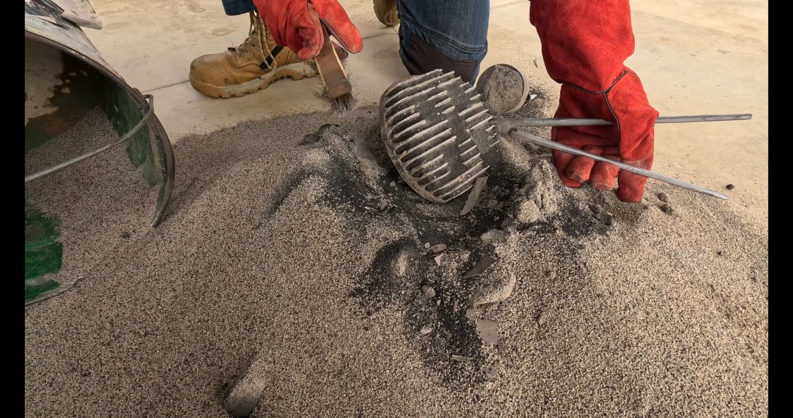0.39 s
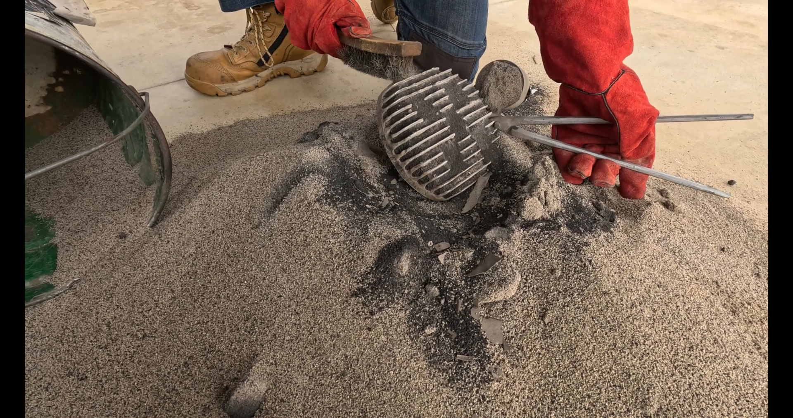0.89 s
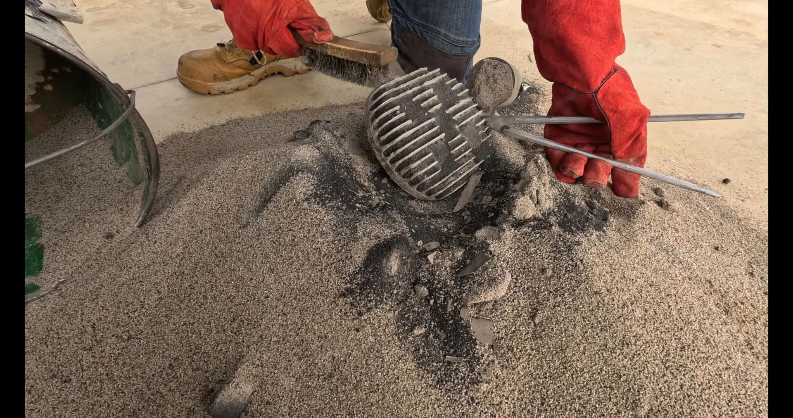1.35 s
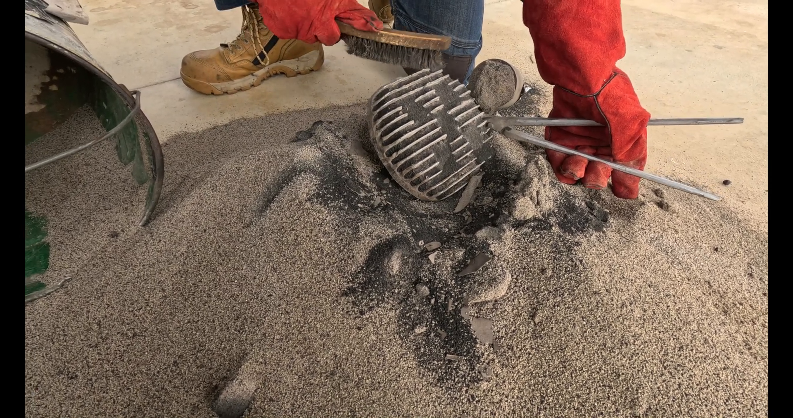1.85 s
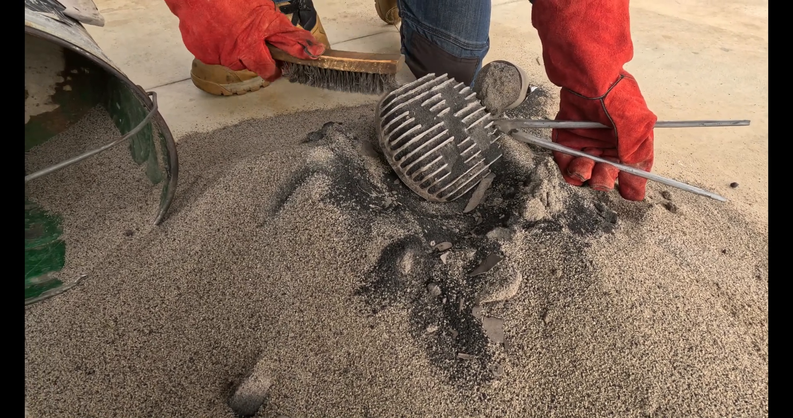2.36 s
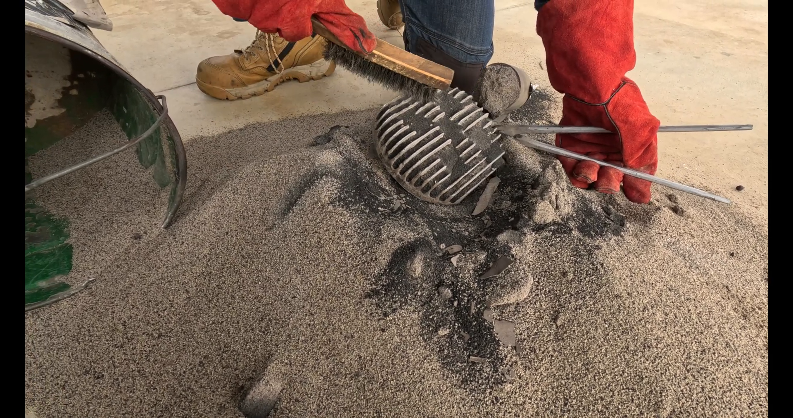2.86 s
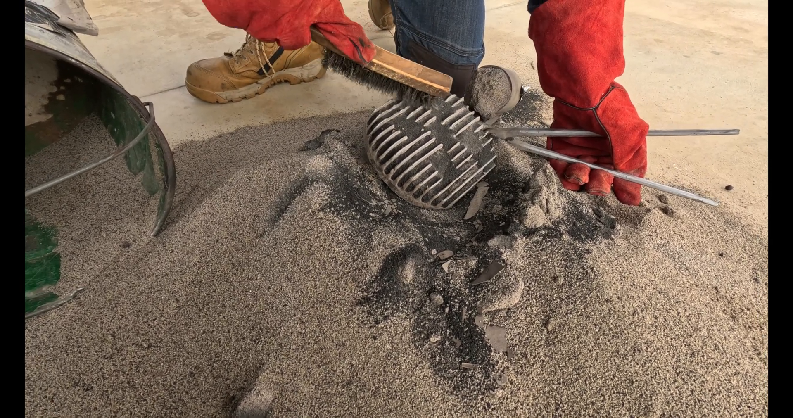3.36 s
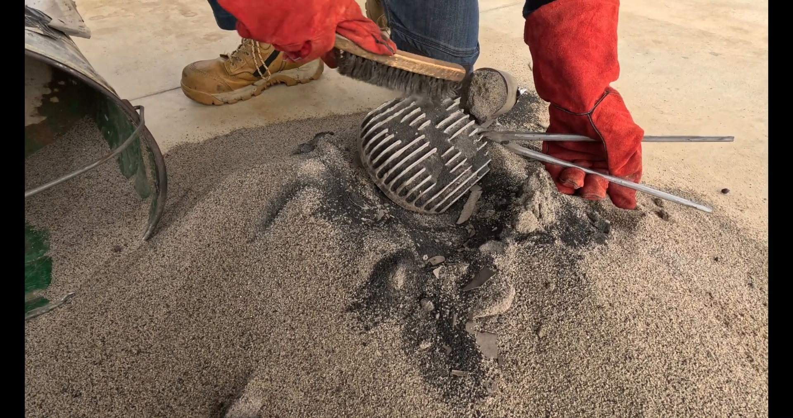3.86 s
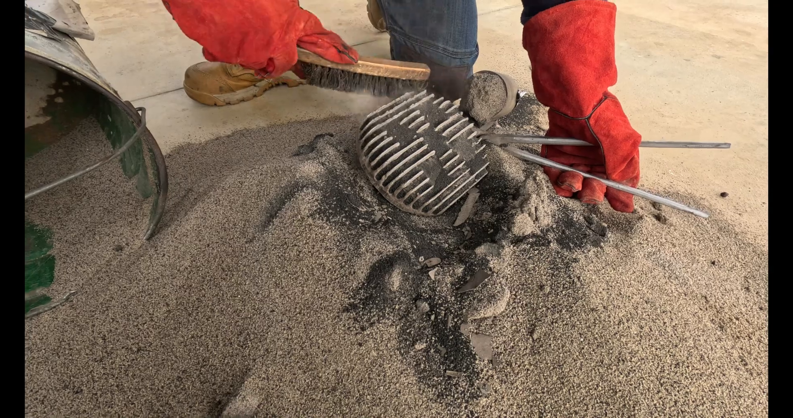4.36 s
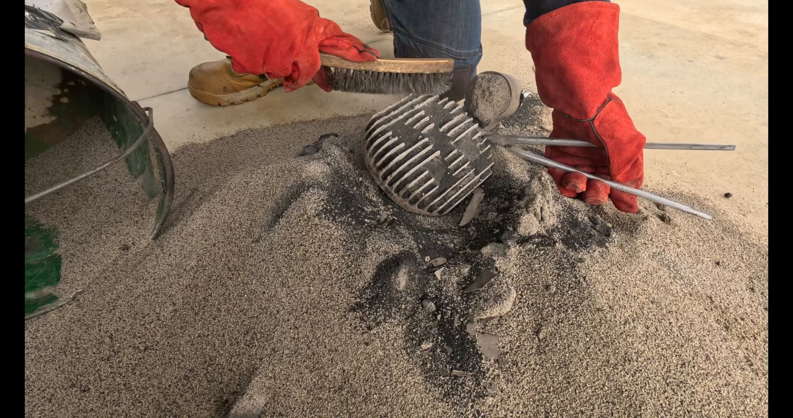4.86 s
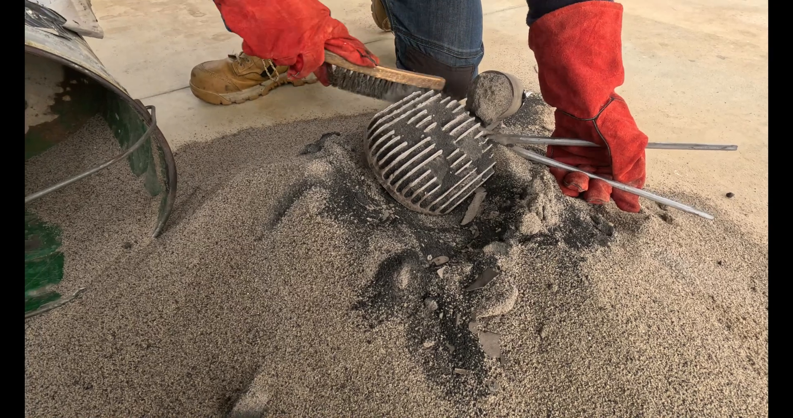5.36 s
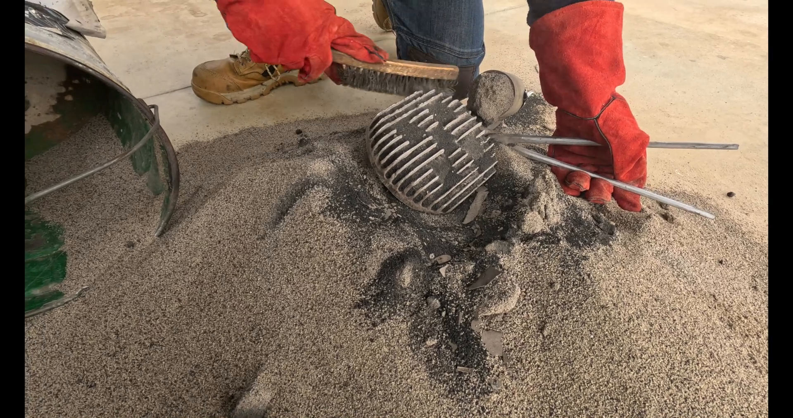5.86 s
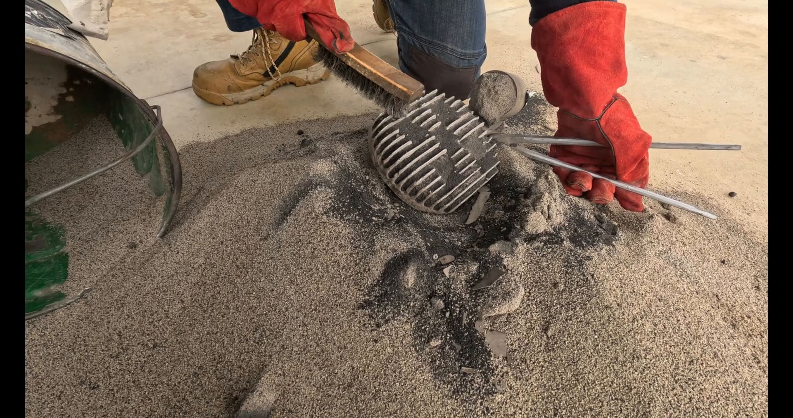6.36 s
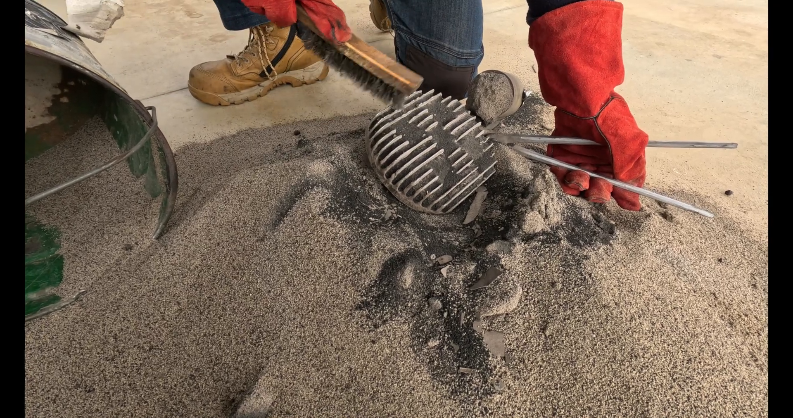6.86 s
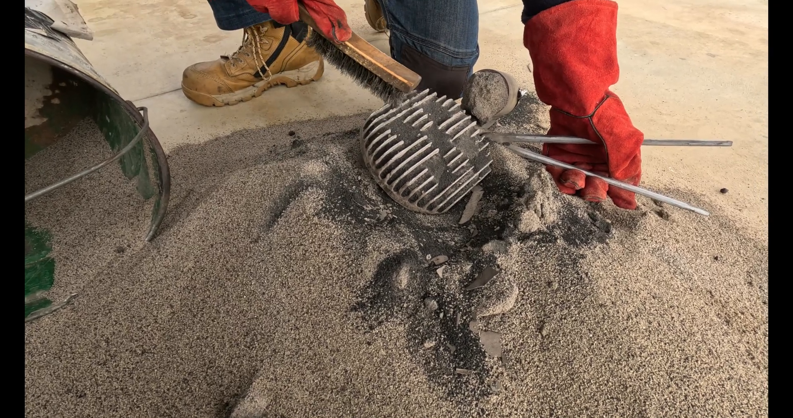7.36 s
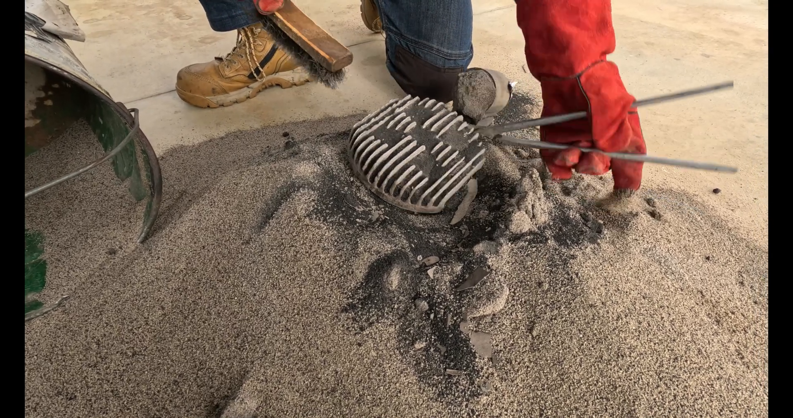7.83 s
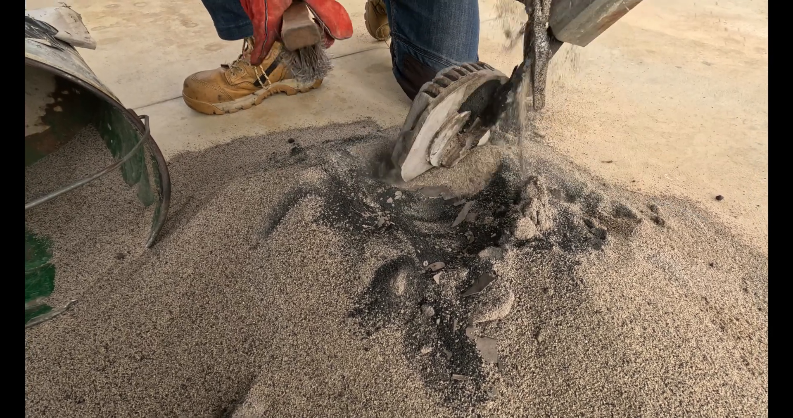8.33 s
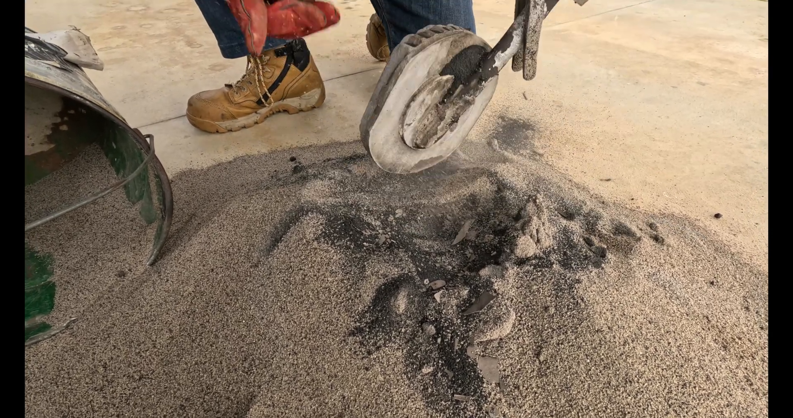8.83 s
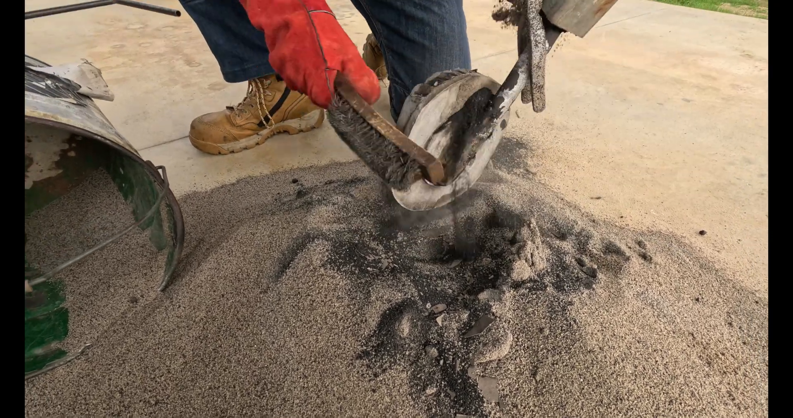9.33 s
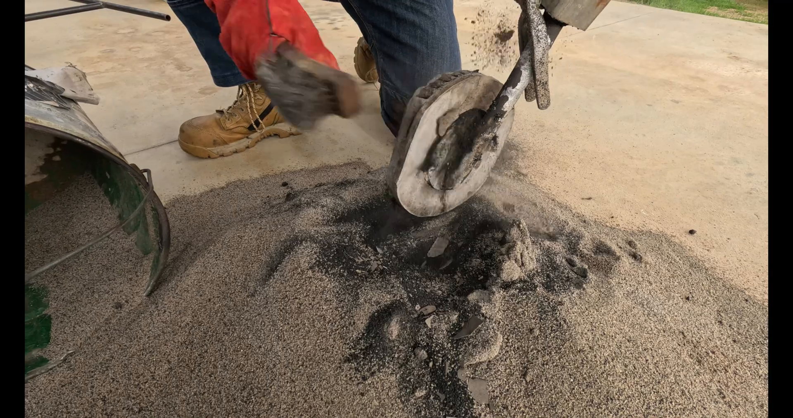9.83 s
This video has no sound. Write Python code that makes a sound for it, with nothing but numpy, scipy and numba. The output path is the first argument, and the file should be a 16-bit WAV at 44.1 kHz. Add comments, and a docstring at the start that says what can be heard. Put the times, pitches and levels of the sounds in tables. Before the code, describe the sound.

Close stereo view of a stiff brush scrubbing a sandy finned metal casting. Uneven short strokes and longer sweeps rasp brightly, with small ticks and dropping grit. Strokes quicken and strengthen, then a rattling scuff as the piece is lifted, and four loud wooden-backed knocks ring out with short echoes off a large shed nearby. A bird peeps faintly; low air rumble and distant hiss lie beneath.

```python
"""Scrubbing sand off a finned casting

A stiff brush scrubs a metal casting beside a large shed; its wooden back knocks the casting four times near the end.
Random bristle flicks make the strokes, decaying sine modes the knocks, sines with overtones the bird's peeps.
Noise makes the sand ticks and scuffs, the air on the microphone ports and a far hiss; a limiter holds the knocks."""
import sys
import numpy as np
from scipy import signal
from scipy.fft import rfft, irfft, next_fast_len
from scipy.io import wavfile
from scipy.ndimage import uniform_filter1d, minimum_filter1d
from numba import njit

SR = 44100
rng = np.random.default_rng(int(sys.argv[2]) if len(sys.argv) > 2 else 0)


def waveform_to_disk(signal):
    """Save audio, clipped to [-1, 1], as 16-bit WAV at the path in sys.argv[1]."""
    frames = np.transpose(np.atleast_2d(signal))
    scaled = np.clip(frames, -1, 1) * 32767
    samples = np.round(scaled).astype(np.int16)
    wavfile.write(sys.argv[1], SR, samples)


def ratio_of_db(decibels):
    """Turn decibels (scalar or array-like) into linear amplitude factors; 0 dB maps to 1."""
    return 10 ** (np.asarray(decibels, float) / 20)


N = 439236
SIZE = next_fast_len(N + SR)
HZ = np.maximum(np.arange(SIZE // 2 + 1) * SR / SIZE, 1)


def rms_one(x):
    """Scales to rms 1."""
    return x / np.sqrt(np.mean(x ** 2) + 1e-20)


def at_hz(points):
    """Reads a table at every spectral line, along log frequency."""
    hz, value = np.transpose(points)
    return np.interp(np.log(HZ), np.log(hz), value)


def shaped(x, response):
    """Filters by a frequency response."""
    return irfft(rfft(x, SIZE) * response, SIZE)[..., :N]


def band_pass(x, low_hz, high_hz, order):
    """Butterworth band."""
    return signal.sosfilt(signal.butter(order, [low_hz, high_hz], "band", fs=SR, output="sos"), x)


def drift(rate_hz):
    """Random wander of spread 1: noise through two equal one-pole low-passes."""
    r = np.exp(-2 * np.pi * rate_hz / SR)
    wander = signal.lfilter([1], [1, -2 * r, r * r], rng.standard_normal(N + SR))
    return rms_one(wander[SR:])


def ring(clicks, hz, t60_s):
    """Damped mode: a unit click starts a sine of height 1."""
    r, w = ratio_of_db(-60 / (t60_s * SR)), 2 * np.pi * hz / SR
    return signal.lfilter([0, np.sin(w)], [1, -2 * r * np.cos(w), r * r], clicks + 1e-18)


@njit
def moving_peak(x, centre_hz, r, sr):
    """Two-pole resonance whose centre moves."""
    y = np.zeros(len(x))
    for i in range(2, len(x)):
        drive = (1 - r * r) / 2 * (x[i] - x[i - 2])
        y[i] = drive + 2 * r * np.cos(2 * np.pi * centre_hz[i] / sr) * y[i - 1] - r * r * y[i - 2]
    return y


# Far sounds at the two ports. Each row: frequency in Hz, left-right likeness from 0 to 1.
LIKENESS = [(60, 0.9), (150, 1), (380, 0.69), (950, 0.79), (2380, 0.44), (5980, 0.82), (15000, 0.86)]


def diffuse(spectrum):
    """Stereo noise from all round, partly alike in both channels; rms 1."""
    mid, side = rfft(rng.standard_normal((2, SIZE)))
    alike = np.clip(at_hz(LIKENESS), 0, 1)
    pair = np.sqrt(1 + alike) * mid + np.sqrt(1 - alike) * side * [[1], [-1]]
    return rms_one(irfft(pair * ratio_of_db(at_hz(spectrum)), SIZE)[:, :N])


# Colour of the far hiss. Each row: frequency in Hz, relative level per Hz in dB.
HISS_COLOUR = [(150, -6), (250, -2.5), (348, -11), (373, -21), (452, -9.5), (845, -12), (1140, -2.5),
               (1530, -7.5), (1670, -5), (3840, -9), (6250, -14), (7800, -15), (8260, -21.5),
               (13900, -33.5), (16000, -52)]
HISS_DB = -56


def hiss():
    """Far hiss: coloured diffuse noise, wavering slightly in level."""
    return ratio_of_db(HISS_DB + .5 * drift(12)) * diffuse(HISS_COLOUR)


# Colour of the air noise. Each row: frequency in Hz, relative level per Hz in dB.
AIR_COLOUR = [(12, -59), (20, 6), (76, -3.5), (149, -7), (179, -7), (211, -10), (304, -18.5), (400, -22.5),
              (520, -59), (880, -120)]
# Air strength over time. Each row: time in seconds, level in dB.
AIR_LEVEL = [(0.0, -54.5), (0.72, -58), (0.8, -52.5), (2.88, -54), (3.05, -55.5), (3.49, -55), (4.94, -54),
             (5.13, -55.5), (6.99, -55.5), (7.18, -55), (7.74, -59), (8.04, -55), (8.32, -50.5),
             (8.63, -57), (9.26, -54.5), (9.96, -51)]


def air():
    """Air stirring on the ports: low rumbling noise with a fluttering level."""
    s, db = np.transpose(AIR_LEVEL)
    level_db = np.interp(np.arange(N) / SR, s, db) + 4.43 * drift(19)
    return ratio_of_db(level_db) * diffuse(AIR_COLOUR)


# Puffs on the ports. Each row: time in seconds, level in dB, left over right in dB, rise in seconds, flutter in dB.
BUMPS = [(0.261, -30, -5, 0.014, -25), (.753, -25.5, 0, 0.005, -8), (2.5, -29, -6, 0.015, -30),
         (3.134, -11.5, -9.5, 0.0053, -2.5), (8.168, -25.5, -5, 0.0065, -34),
         (8.371, -23.5, -2, 0.011, -1.5)]


def bumps(hold_s=0.0031, release_s=0.0043):
    """A puff pulls the membrane in more and more, it flutters and lets go, and the port leak overshoots."""
    pull, kicks = np.zeros((2, N)), np.zeros((2, N))
    t = np.arange(-2000, 2000) / SR - hold_s
    for s, db, pan_db, rise_s, flutter_db in BUMPS:
        size, i = ratio_of_db(db + np.array([[pan_db / 2], [-pan_db / 2]])), round(s * SR)
        pull[:, i - 2000:i + 2000] -= size * np.exp(np.where(t < 0, t / rise_s, -t / release_s))
        kicks[:, i] = size[:, 0] * ratio_of_db(flutter_db)
    flutter = ring(kicks, 273, 0.0068)
    return signal.lfilter(*signal.butter(1, 18, "high", fs=SR), pull + flutter)


# Colour of the echoes. Each row: frequency in Hz, level per Hz in dB.
SHED_COLOUR = [(76, -40), (130, 2.5), (192, 7.5), (284, -12), (597, -3.5), (807, -15), (1070, 1.5),
               (1450, -8), (1960, -9), (2510, -12), (4430, -24.5), (5190, -30), (9000, -45), (11700, -64),
               (19800, -120)]
# Decay of the echoes. Each row: frequency in Hz, t60 in seconds.
SHED_T60 = [(150, 0.29), (600, 0.73), (1500, 0.57), (4000, 0.48), (9000, 0.65)]


def shed(x, gap_s=0.0029, build_s=0.011):
    """Echoes off walls: noise that builds after a gap and dies octave by octave."""
    t, noise, tail = np.arange(SR) / SR, diffuse([(20, 0), (20000, 0)])[:, :SR], 0
    hz, t60_s = np.transpose(SHED_T60)
    for low_hz in 60 * 2. ** np.arange(8):
        band_t60_s = np.interp(np.log(low_hz * np.sqrt(2)), np.log(hz), t60_s)
        tail = tail + band_pass(noise, low_hz, 2 * low_hz, 2) * ratio_of_db(-60 * t / band_t60_s)
    tail = tail * (1 - np.exp(-np.maximum(t - gap_s, 0) / build_s))
    return shaped(x, rfft(tail, SIZE) * ratio_of_db(at_hz(SHED_COLOUR)))


# Peeps. Each row: loudest moment in seconds, length after it in seconds, pitch in Hz,
# first partial in dB, second partial in dB.
PEEPS = [(3.757, 0.064, 2836, -55, -54), (3.952, 0.11, 2770, -50, -58), (4.676, .125, 2710, -50.5, -53.5),
         (4.92, .03, 2730, -55, -59), (5.655, .11, 2614, -49, -59), (9.459, 0.11, 2550, -53, -59.5),
         (9.651, 0.073, 2540, -48.5, -71)]
# Partials 2 to 4. Each entry: level against the second partial's setting in dB.
PEEP_OVERTONES_DB = [0.5, -15, -24]
SCOOP_S, SCOOP_SHARE, SCOOP_DB = 0.0195, .1, -1   # slide up into the pitch, fast at first
PEEP_CREEP_PER_S = 0.067   # share by which the pitch then creeps up
FIRST_DB_PER_S, SECOND_DB_PER_S, PEEP_OFF_DB_PER_S = -130, -110, -1600


def bird():
    """Husky peeps: a wavering, rattling tone with overtones."""
    t, out = np.arange(N) / SR, np.zeros(N)
    waver, rattle = 1 + 0.0163 * drift(433), ratio_of_db(4.6 * drift(200))
    for s, length_s, hz, first_db, second_db in PEEPS:
        span = slice(round((s - .1) * SR), round((s + .25) * SR))
        before, after = np.maximum(s - t[span], 0), np.maximum(t[span] - s, 0)
        early = np.minimum(before / SCOOP_S, 1)
        outside_s = np.maximum(before - SCOOP_S, 0) + np.maximum(after - length_s, 0)
        gate_db = SCOOP_DB * early + PEEP_OFF_DB_PER_S * outside_s
        pitch_hz = hz * (1 - SCOOP_SHARE * early ** 2 + PEEP_CREEP_PER_S * after) * waver[span]
        phase = 2 * np.pi * np.cumsum(pitch_hz) / SR
        first = ratio_of_db(first_db + FIRST_DB_PER_S * after) * np.sin(phase)
        upper = sum(ratio_of_db(db) * np.sin((k + 2) * phase) for k, db in enumerate(PEEP_OVERTONES_DB))
        out[span] += ratio_of_db(gate_db) * (first + ratio_of_db(second_db + SECOND_DB_PER_S * after) * upper)
    return np.sqrt(2) * rattle * out


def rattles(table, t60_s, width):
    """Short dying noise bursts, each in a band round its centre."""
    out, t = np.zeros(N), np.arange(2000) / SR
    for s, db, hz in table:
        burst = band_pass(rng.standard_normal(2000), hz / (1 + width), hz * (1 + width), 2)
        i = round(s * SR)
        out[i:i + 2000] += rms_one(burst) * ratio_of_db(db - 6 - 60 * t / t60_s)
    return out


# Tufts landing. Each row: time in seconds, level in dB, centre in Hz.
TICKS = [(0.7454, -27.5, 6200), (0.9113, -31, 7000), (0.9543, -36, 7610), (1.59, -35, 6200),
         (1.6443, -33, 7360), (2.8205, -36, 7510), (3.4361, -34, 3580), (4.344, -36, 3900),
         (4.6944, -34, 5560), (4.855, -27, 4700), (4.8943, -33, 5440), (5.0669, -25, 6730),
         (6.3909, -29.5, 6960), (6.6064, -34, 7330), (6.8528, -35, 7700), (7.2858, -35, 7500),
         (7.5226, -31, 7480), (7.6611, -31, 7500), (7.806, -41, 7770), (8.055, -37.5, 6380),
         (8.091, -36.5, 6200), (8.2157, -29, 4950), (8.2345, -23.5, 5550), (8.33, -23, 4200),
         (8.354, -25, 4500), (8.3652, -13.5, 2280), (9.3257, -37, 5600), (9.556, -44, 6500),
         (9.774, -39, 4500), (9.795, -48, 6500)]
TICK_T60_S = .014


def ticks():
    """Landing tufts rattle in a wide band."""
    return rattles(TICKS, TICK_T60_S, width=0.43)


# Lumps of sand dropping. Each row: time in seconds, level in dB, centre in Hz.
CLODS = [(0.6936, -40, 1210), (2.185, -35.5, 1280), (8.6078, -38, 1280), (8.646, -25, 1450),
         (8.668, -31, 1410), (8.7829, -44, 1000), (8.9545, -34.5, 1450)]
CLOD_T60_S = 0.036
FORERUN_S, FORERUN_DB, FORERUN_HZ = 0.0096, -26, 1460   # faint burst ahead of each knock: lead before the knock, level against its blow, centre


def clods():
    """Dropped lumps plink in a narrow band; a faint narrow burst also sounds just before each knock."""
    foreruns = [(s - FORERUN_S, blow_db + FORERUN_DB, FORERUN_HZ) for s, blow_db, _, _ in KNOCKS]
    return rattles(CLODS + foreruns, CLOD_T60_S, width=0.18)


# The hand leans on the work and it grates on the sand.
# Each row: centre time in seconds, level in dB, centre in Hz, half length in seconds.
SCUFFS = [(0.825, -63, 393, 0.036), (2.3, -53, 645, 0.021), (5.086, -55, 500, 0.036),
          (6.496, -49, 570, 0.017), (8.35, -51.5, 750, 0.08), (0.805, -48.5, 137, 0.059),
          (5.06, -52, 159, 0.043), (6.528, -54.5, 137, 0.052)]


def scuffs():
    """Grating: low bands of noise that swell and fade."""
    out, t, grain = np.zeros(N), np.arange(N) / SR, rng.standard_normal(N)
    for s, db, hz, half_s in SCUFFS:
        band = band_pass(grain, hz / 1.16, hz * 1.55, 1)
        out += ratio_of_db(db) * rms_one(band) * np.exp(-((t - s) / half_s) ** 2)
    return out


# Short strokes that swell and stop. Each row: fastest moment in seconds, swell in seconds, stop in seconds,
# bristle level in dB, dull scrape over the bristles in dB.
STROKES = [(1.038, 0.23, 0.032, -45, -12.5), (1.216, 0.18, .04, -44.5, -9), (1.296, 0.027, .045, -47, -7.5),
           (1.456, 0.086, 0.041, -44, -10.5), (1.654, 0.023, 0.04, -45.5, -8.5),
           (1.81, 0.13, 0.011, -48, -8.5), (2.131, 0.0034, 0.047, -52.5, -5.5),
           (2.475, 0.045, .07, -56.5, -2), (2.565, 0.053, 0.018, -48, -8),
           (2.82, 0.0023, 0.043, -47.5, -9.5), (3.277, 0.16, 0.0085, -51.5, -11),
           (3.489, 0.024, 0.12, -41.5, -11), (3.674, 0.04, .017, -50, -7.5),
           (3.867, .003, 0.028, -43, -14.5), (4.854, 0.0014, 0.051, -41.5, -17),
           (5.38, 0.0027, 0.05, -52.5, -6), (5.496, 0.061, 0.098, -44.5, -5.5),
           (5.638, 0.042, .09, -60, 8.5), (5.996, 0.058, 0.17, -43, -8.5), (6.18, 0.082, 0.027, -39, -17),
           (6.409, .024, .05, -44, -11.5), (6.478, 0.065, 0.052, -41, -12), (6.623, 0.021, .016, -44, -10),
           (6.697, 0.0093, 0.087, -41.5, -12), (6.861, .018, 0.051, -40.5, -15.5),
           (7.039, 0.071, 0.025, -37.5, -14.5), (7.184, 0.085, 0.025, -37, -11.5),
           (7.325, 0.058, 0.043, -32.5, -17), (7.46, 0.066, 0.026, -36.5, -12),
           (7.558, 0.042, 0.017, -38.5, -12), (7.69, 0.043, 0.016, -38, -13.5),
           (7.84, .065, 0.029, -39, -16), (8.28, 0.071, .04, -43.5, -2.5), (8.368, .065, 0.021, -39, -8),
           (8.657, 0.039, 0.03, -39.5, -4.5), (9.37, 0.045, 0.046, -56, -10)]
# Long sweeps that hold; in the last three rows the brush rests on the fins between strokes.
# Each row: full speed from, in seconds, swell in seconds, hold in seconds, bristle level in dB,
# change over the hold in dB, dull scrape over the bristles in dB.
SWEEPS = [(0.745, .003, 0.11, -52.5, -2.5, -2.5), (2.284, 0.068, 0.079, -48, 1.5, -5),
          (2.893, 0.026, 0.24, -44.5, -5, -8), (3.964, 0.051, 0.13, -40, -4, -9.5),
          (4.344, 0.0037, 0.26, -47.5, 3, -8), (4.968, 0.041, 0.12, -40, -2.5, -12.5),
          (.95, .05, 0.76, -68, 0, -8), (3.44, 0.0091, 0.16, -58, -.6, -12),
          (6.72, .05, 1.15, -61, 2.5, -12.5)]
# Resonance of the fin gaps at the spot being brushed. Each row: time in seconds, frequency in Hz.
SPOT = [(.74, 6600), (1.04, 8100), (1.46, 7830), (1.65, 7700), (2.25, 6800), (2.56, 8100), (2.85, 7200),
        (3.13, 6050), (3.4, 6400), (3.95, 5460), (4.1, 6600), (4.35, 5740), (4.6, 7600), (4.85, 5660),
        (5.1, 7200), (5.5, 6800), (5.65, 5500), (6.0, 6250), (6.17, 8060), (6.47, 7440), (6.7, 7950),
        (7.85, 7830), (8.2, 5450), (8.65, 6200), (9.37, 7550)]
SWEEP_STOP_S = 0.066
TOUCH_DB, LIFT_DB = -15, -25.5   # first touch and lift-off, against full speed
OFF_DB_PER_S = -900   # off the metal
SWELL_BEND, STOP_BEND = 1.15, 1.57   # above 1: lingers near full speed
SWELL_DULLS, STOP_DULLS = 0.15, 0.44   # dB of dull scrape gained per dB below full speed
SLOW_FLATTENS = 0.0012   # share by which the gap resonance sinks per dB below full speed


def motion():
    """Level, gap resonance and dullness of the brush; overlapping strokes blend by their power."""
    t = np.arange(0, N + 64, 32) / SR
    rows = [(s, up, 0, down, db, 0, dull) for s, up, down, db, dull in STROKES]
    rows += [(s, up, hold, SWEEP_STOP_S, db, change, dull) for s, up, hold, db, change, dull in SWEEPS]
    s, up, hold, down, db, change, dull = np.transpose(rows)[:, :, None]
    before, after = np.maximum(s - t, 0), np.maximum(t - s - hold, 0)
    swell_db = TOUCH_DB * np.minimum(before / up, 1) ** SWELL_BEND
    stop_db = LIFT_DB * np.minimum(after / down, 1) ** STOP_BEND
    off_db = OFF_DB_PER_S * (np.maximum(before - up, 0) + np.maximum(after - down, 0))
    held_db = db + change * np.clip((t - s) / (hold + 1e-9), 0, 1)
    power = ratio_of_db(np.maximum(held_db + swell_db + stop_db + off_db, -200)) ** 2
    share = power / power.sum(axis=0)
    level_db = 10 * np.log10(power.sum(axis=0))
    gap_hz = np.interp(t, *np.transpose(SPOT)) * (1 + SLOW_FLATTENS * (share * (swell_db + stop_db)).sum(axis=0))
    dull_db = (share * (dull - SWELL_DULLS * swell_db - STOP_DULLS * stop_db)).sum(axis=0)
    return [np.interp(np.arange(N) / SR, t, curve) for curve in (level_db, gap_hz, dull_db)]


def grit(per_s, spread_db, clump_db, clump_hz):
    """Bristle tips flick free at random, in clumps as tufts cross the fins; rms 1."""
    sizes = ratio_of_db(spread_db * np.minimum(rng.exponential(1, N), 5)) * rng.choice([-1, 1], N)
    flicked = rng.random(N) < per_s / SR
    return rms_one(sizes * flicked * ratio_of_db(clump_db * drift(clump_hz)))


# Colour of the bristle flicks. Each row: frequency in Hz, relative level per Hz in dB.
BRISTLES = [(1290, -9), (2200, -7), (2730, -2.5), (3220, -2), (4720, -4), (5300, -5.5), (7330, -4),
            (12300, -13.5), (15000, -21), (16000, -59)]
# Colour of the dragged sand. Each row: frequency in Hz, relative level per Hz in dB.
SCRAPE = [(71, -49), (120, 4), (217, 2), (415, -28), (600, -17.5), (818, -8), (1210, -4.5), (1330, -6),
          (1530, 6), (1760, -2), (2100, -8), (3500, -31), (4550, -44), (7700, -120)]


def brush():
    """Flicks sound bright and ring in the gaps between fins; the dragged sand scrapes duller."""
    level_db, gap_hz, dull_db = motion()
    bristles = ratio_of_db(at_hz(BRISTLES))
    flicks = rms_one(shaped(grit(9000., spread_db=0.5, clump_db=2.0, clump_hz=67.5), bristles))
    tips = signal.sosfilt(signal.butter(4, 9000, "high", fs=SR, output="sos"), flicks)
    flicks = flicks - tips * np.clip((dull_db - 18) / 16, 0, 1)   # the dullest moments lose the tips

    tufts = shaped(grit(4000., spread_db=2.0, clump_db=3.0, clump_hz=110), bristles)   # crossing the fin edges
    r = np.exp(-np.pi * 700 / SR)   # 700 Hz bandwidth
    gaps = rms_one(moving_peak(tufts, gap_hz, r, SR))
    narrower = rms_one(moving_peak(tufts, 1.168 * gap_hz, r, SR))   # a narrower gap beside it
    ringing = np.clip((-3 - dull_db) / 14, 0, .95)   # the least dull strokes whistle most
    whistle = gaps + ratio_of_db(-4 + 1.3 * drift(1.7)) * narrower
    bright = np.sqrt(1 - ringing) * flicks + np.sqrt(ringing) * whistle

    dull = rms_one(shaped(grit(5000., spread_db=2.0, clump_db=1.5, clump_hz=38.6), ratio_of_db(at_hz(SCRAPE))))
    snaps = band_pass(grit(42.0, spread_db=1.0, clump_db=-2.0, clump_hz=16.0), 5500, 10500, 4)
    # single wires spring back, also between strokes
    springing = ratio_of_db(-29 + 0.53 * np.maximum(level_db, -105)) * snaps
    return ratio_of_db(level_db) * (bright + ratio_of_db(dull_db) * dull) + springing


# Modes of brush back and casting. Each row: frequency in Hz, level in dB, t60 in seconds.
BODY = [(100, -28.5, 0.1), (182.4, -20, 0.14), (262, -22, 0.044), (567, -16, 0.024), (800, -11.5, 0.018),
        (1006, -6.5, 0.018), (1223, -6, 0.018), (1450, 2, 0.0069), (1990, -1.5, 0.0066),
        (2400, -10.5, 0.023), (2620, -10, 0.013), (2985, -13, 0.021), (3560, -7, 0.0091),
        (4090, -14.5, 0.013), (4700, -13, 0.0038), (6800, -14, 0.0043), (8530, -17, 0.0012)]
# Blows. Each row: time in seconds, blow level in dB, hardness in dB per octave of treble, left over right in dB.
KNOCKS = [(9.1556, -2, 5, 1), (9.4202, -2.5, 0, -1), (9.6323, -2, -3.5, 0), (9.8683, -4, 2, -1)]


def knocks(contact_t60_s=0.0035, crack_db=-6, crack_hz=6000):
    """A chattering contact cracks and excites the modes, each with its own random strength and shift per blow."""
    out = np.zeros((len(KNOCKS), N))
    for j, (s, blow_db, hard_db, _) in enumerate(KNOCKS):
        chatter = np.abs(rng.standard_normal(20000)) * ratio_of_db(-60 * np.arange(20000) / SR / contact_t60_s)
        force = chatter / np.linalg.norm(chatter)
        blow = ratio_of_db(crack_db + hard_db) * band_pass(force, 900, crack_hz, 3)
        for k, (hz, db, t60_s) in enumerate(BODY):
            strength, shift = rng.normal(0, 1, 2)
            size = ratio_of_db(db + hard_db * np.log2(max(hz / 1500, 1)) + 2.0 * strength)
            tap = ring(force, hz * (1 + 0.025 * shift), t60_s)
            blow += size * tap / np.abs(tap).max() * (-1) ** k
        i = round(s * SR)
        out[j, i:i + 20000] = ratio_of_db(blow_db) * blow[:N - i]
    pan_db = np.array(KNOCKS)[:, 3]
    return ratio_of_db(np.array([pan_db / 2, -pan_db / 2])) @ out


def far_bangs():
    """Far walls blur the modes: each blow reaches them as one bang, its treble set by the hardness."""
    low, high = np.zeros(N), np.zeros(N)
    for s, blow_db, hard_db, _ in KNOCKS:
        low[round(s * SR)] = ratio_of_db(blow_db)
        high[round(s * SR)] = ratio_of_db(blow_db + hard_db)
    low = signal.lfilter(*signal.butter(1, 2200, "low", fs=SR), low + 1e-18)
    return low + signal.lfilter(*signal.butter(1, 2200, "high", fs=SR), high + 1e-18)


# The nearest walls answer alone. Each row: delay in seconds, level in dB.
WALL_SLAPS = [(0.022, -29), (.042, -34.5)]


def wall_slaps(blows):
    """Single delayed copies of the blows."""
    unwrapped = np.arange(N) > SR
    return sum(ratio_of_db(db) * np.roll(blows, round(lag_s * SR), axis=1) * unwrapped for lag_s, db in WALL_SLAPS)


# Phase between the ports for near sounds. Each row: frequency in Hz, left lead in radians.
LEAD = [(0, 0), (2500, -0.22), (3010, -0.55), (5770, -0.61), (6720, -0.72), (11100, 0.29), (15700, 1),
        (16200, -0.6)]


def ports(x, ground_db=-13, left_s=0.00154, right_s=0.0013):
    """A near sound reaches the two ports with a phase lead that depends on pitch, and again off the ground."""
    turn = np.exp(.5j * at_hz(LEAD))
    ground = 1 + ratio_of_db(ground_db) * np.exp(-2j * np.pi * HZ * np.array([[left_s], [right_s]]))
    return shaped(x, ground * [turn, turn.conj()])


# The ports resonate, then fall away. Each row: frequency in Hz, gain in dB.
CAPSULE = [(5500, 1), (7800, 0.5), (8700, -0.5), (12000, -2), (14500, -4.5), (16000, -16)]
# Balance of the port pair. Each row: frequency in Hz, left over right in dB.
LEAN = [(60, -1.5), (180, -1.5), (550, -1), (1650, 2), (4970, -1), (15000, 0.5)]


def capsule(x):
    """Frequency response and left-right balance of the ports."""
    lean_db = at_hz(LEAN) / 2 * np.array([[1], [-1]])
    return shaped(x, ratio_of_db(at_hz(CAPSULE) + lean_db))


def scene():
    """All sources, near and far."""
    work, blows, peeps = brush() + ticks() + clods() + scuffs(), knocks(), bird()
    echoes = shed(ratio_of_db(-32) * work + ratio_of_db(-8) * far_bangs() + ratio_of_db(-27) * peeps)
    near = ports(work + blows + wall_slaps(blows)) + peeps * ratio_of_db(np.array([[1.5], [-1.5]]))
    return capsule(near + echoes + air() + hiss()) + bumps()


def roll_off(x):
    """The treble ends steeply here."""
    return signal.sosfilt(signal.butter(12, 16660, fs=SR, output="sos"), x)


def record(dry, top_db=-1.5, release_db_per_s=300, attack_s=0.00013):
    """A look-ahead limiter ducks peaks above its ceiling and recovers at a steady rate in dB."""
    over_db = np.maximum(20 * np.log10(np.abs(dry).max(axis=0) + 1e-9) - top_db, 0)
    slope_db = release_db_per_s * np.arange(N) / SR
    held_db = np.maximum.accumulate(over_db + slope_db) - slope_db
    window = 2 * max(round(attack_s * SR), 1) + 1
    duck_db = uniform_filter1d(-minimum_filter1d(-held_db, window), window)
    return roll_off(dry * ratio_of_db(-duck_db))


dry = scene()
out = record(dry)
waveform_to_disk(out)
```